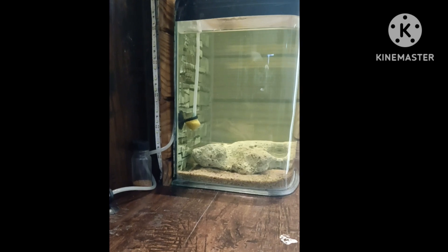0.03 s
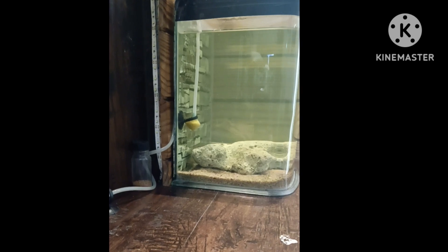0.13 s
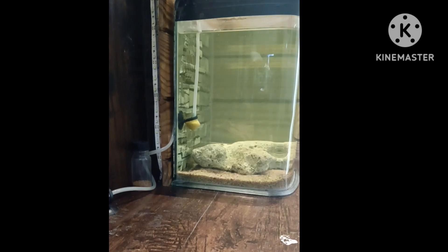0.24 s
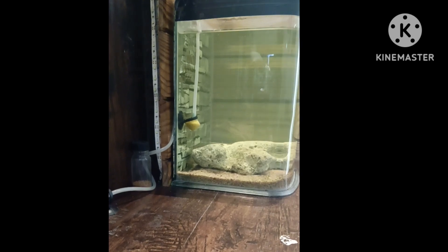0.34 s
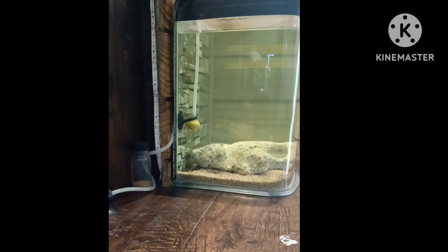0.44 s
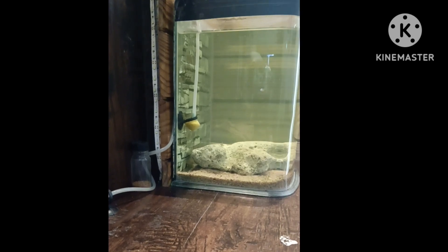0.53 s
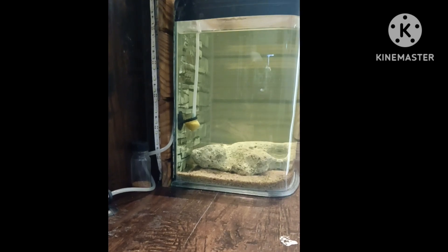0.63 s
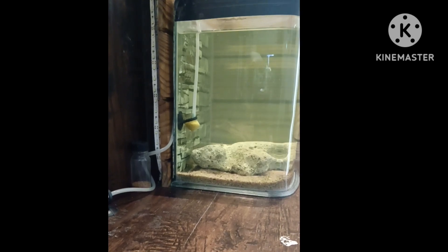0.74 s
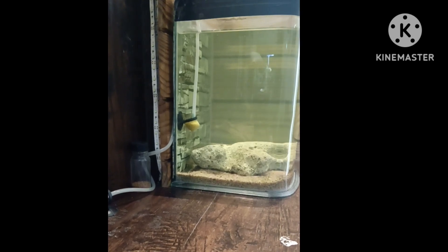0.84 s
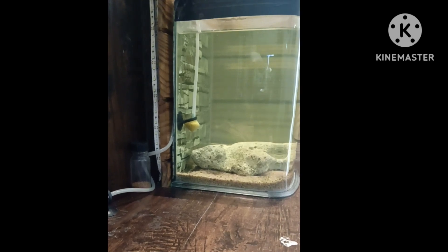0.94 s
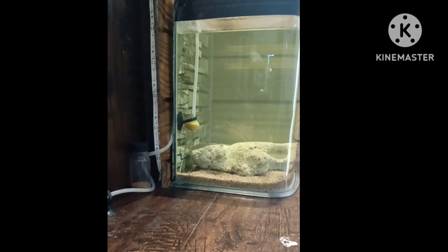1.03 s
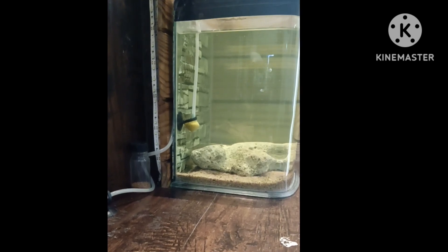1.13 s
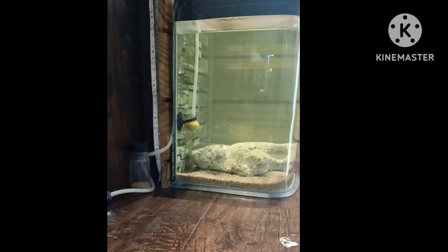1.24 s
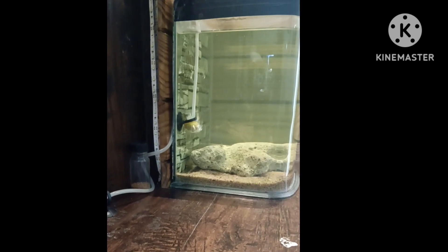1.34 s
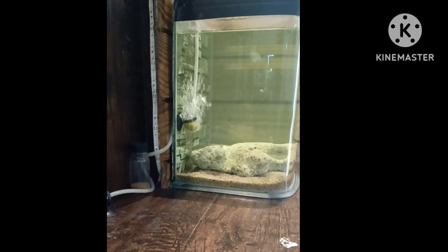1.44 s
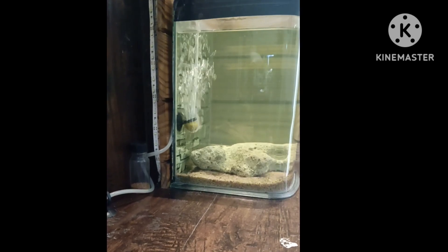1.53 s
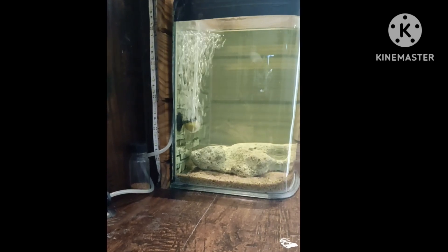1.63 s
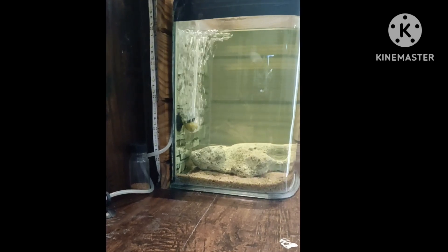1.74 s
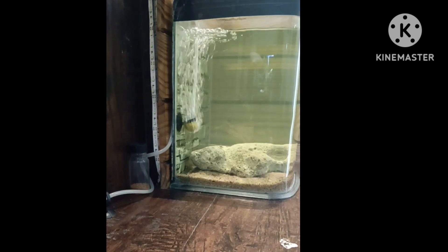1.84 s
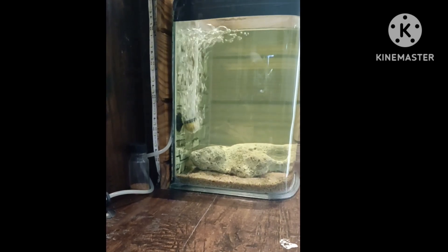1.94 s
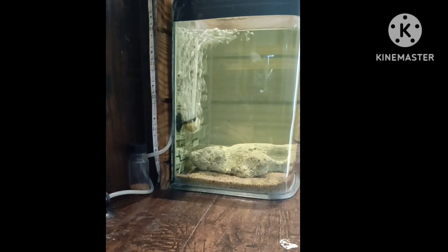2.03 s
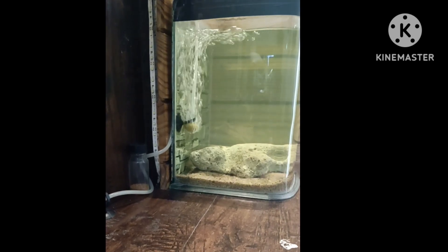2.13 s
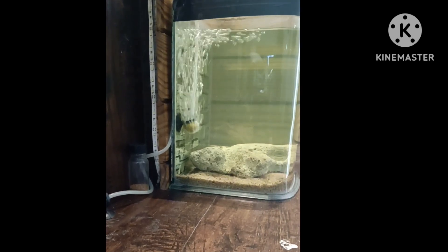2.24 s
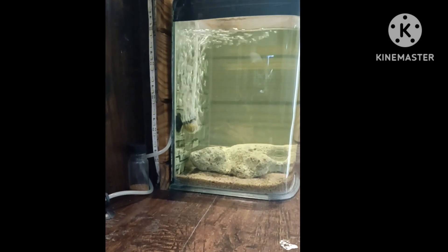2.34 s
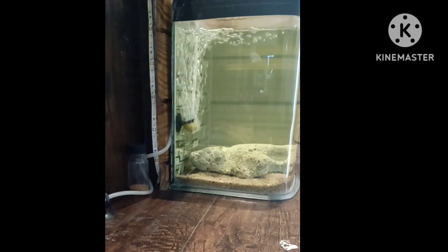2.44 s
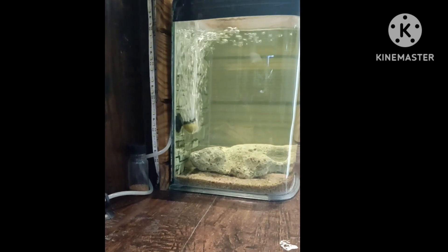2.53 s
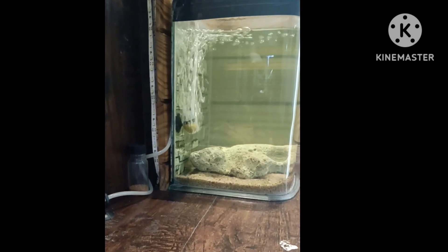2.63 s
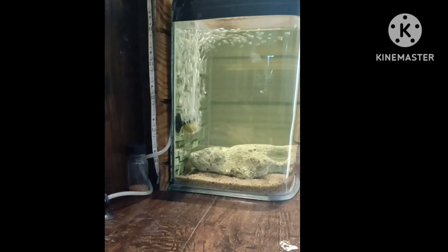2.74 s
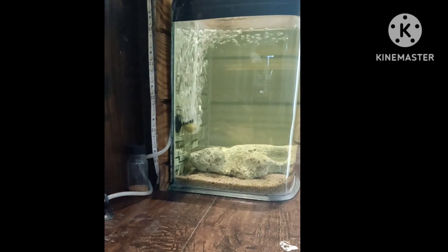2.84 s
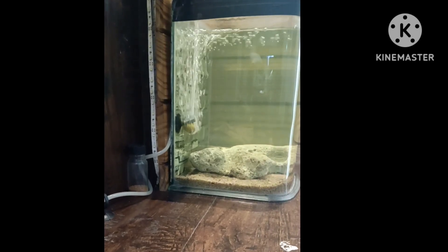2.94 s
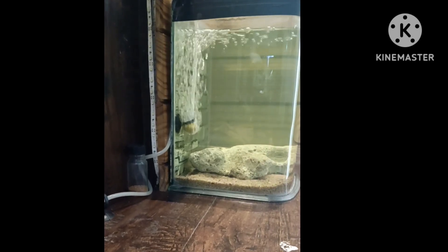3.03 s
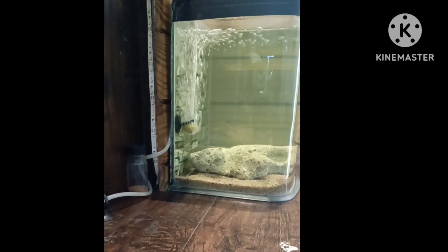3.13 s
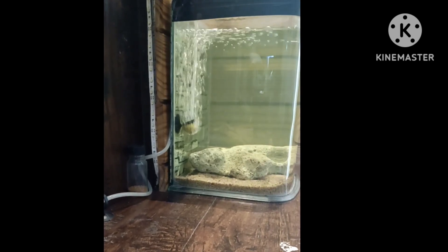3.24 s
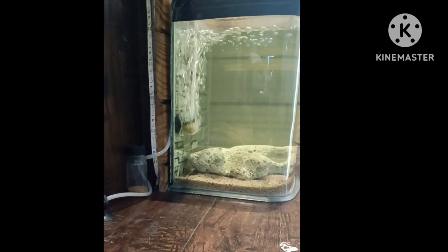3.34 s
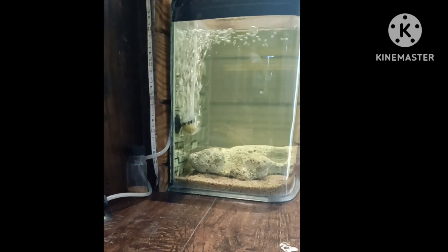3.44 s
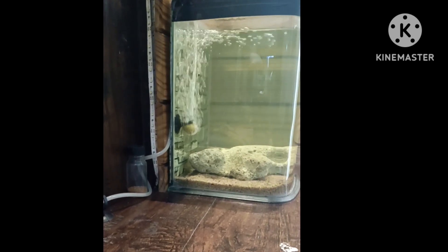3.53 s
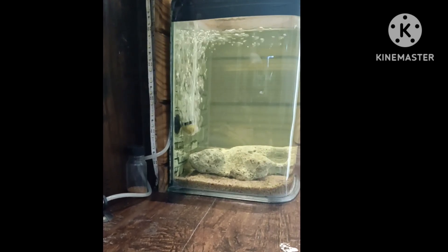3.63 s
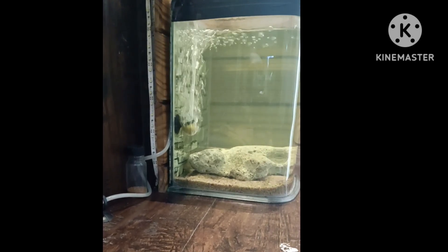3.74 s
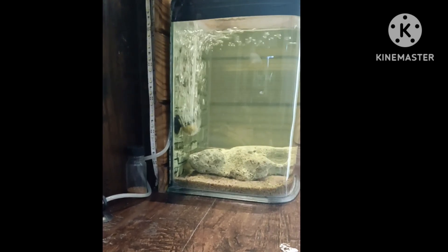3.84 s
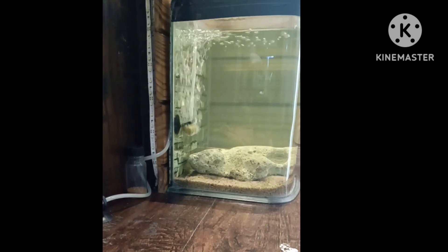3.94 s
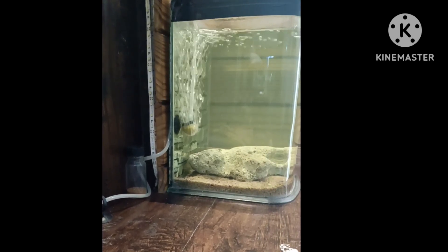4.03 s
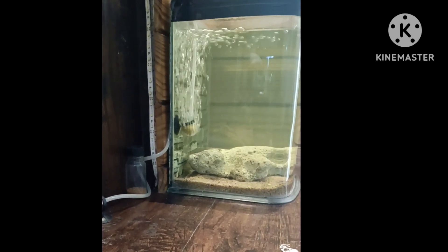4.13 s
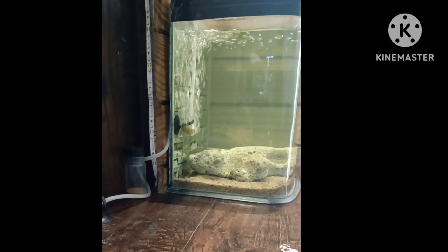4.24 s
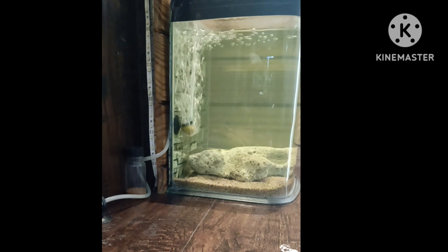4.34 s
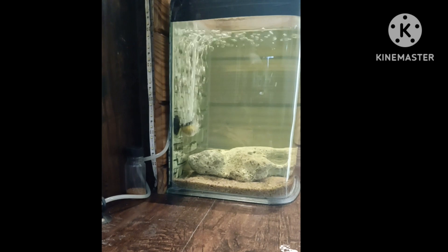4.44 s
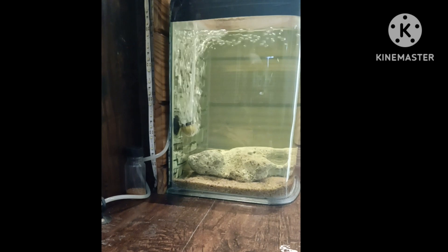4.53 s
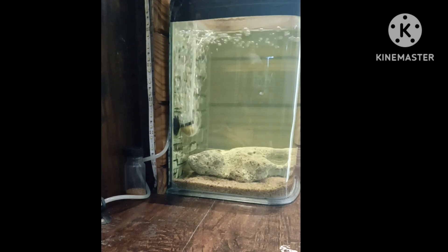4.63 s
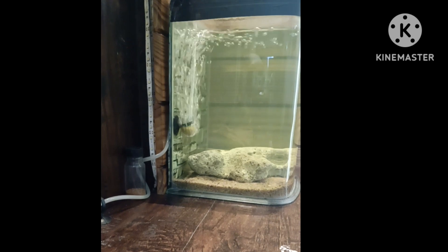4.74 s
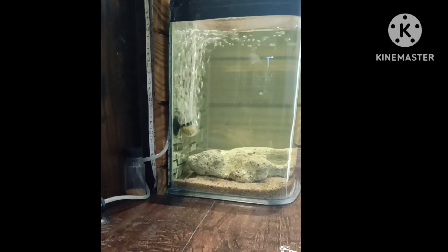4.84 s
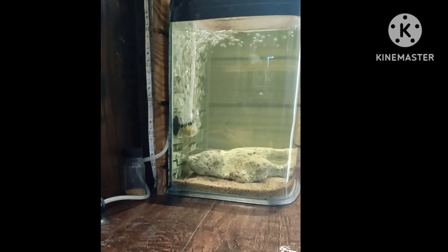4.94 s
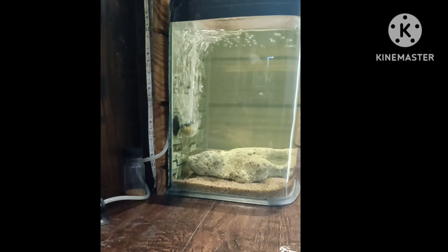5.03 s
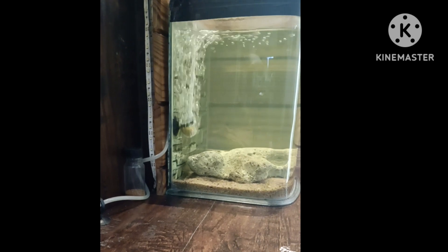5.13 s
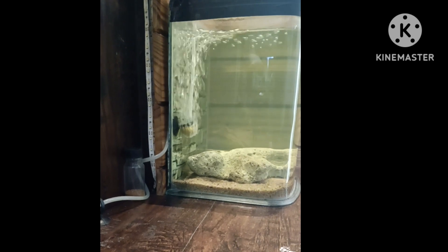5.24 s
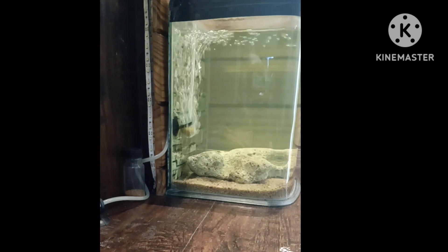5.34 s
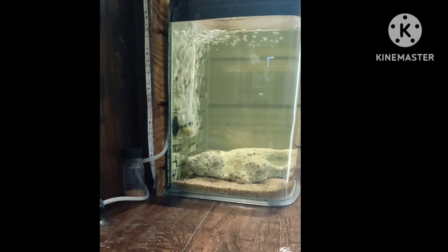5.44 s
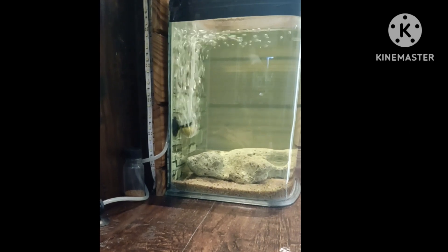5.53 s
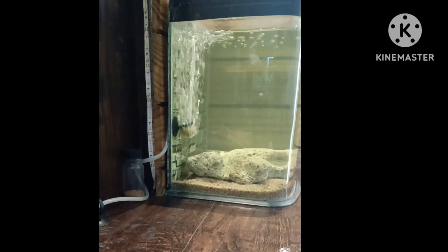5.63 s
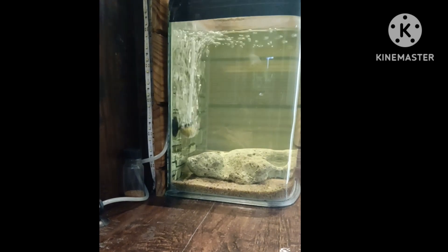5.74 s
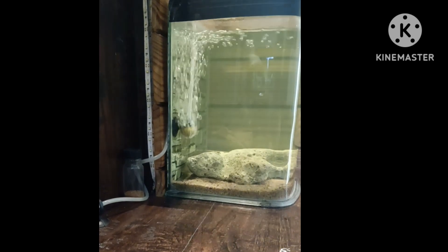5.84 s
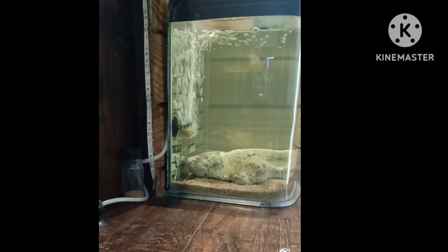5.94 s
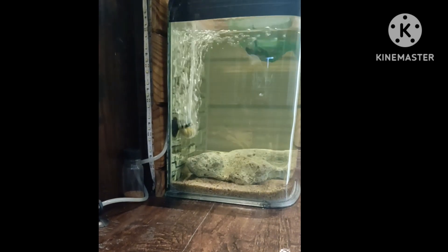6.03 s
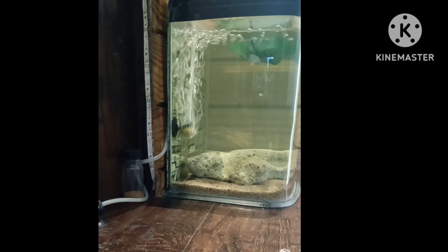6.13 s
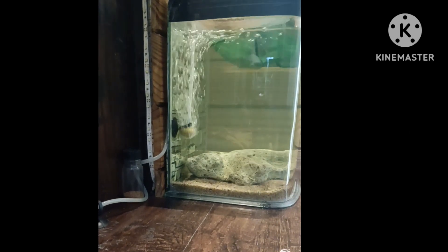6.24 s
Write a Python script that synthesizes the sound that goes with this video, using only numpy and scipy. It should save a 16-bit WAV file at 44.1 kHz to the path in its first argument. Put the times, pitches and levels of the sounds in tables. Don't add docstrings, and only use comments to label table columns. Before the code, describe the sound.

Close handheld stereo pickup indoors: bumps on a wooden table, small drips and distant chirping come first. A loud dry click is followed by a knocking, squeaky motor start. The pump then drones evenly with a nasal buzz, over rushing air and low bubbling, slightly altered as a hand presses and releases it. Faint finger ticks and sparrows continue until the end.

```python
import sys
import numpy as np
from scipy import signal
from scipy.fft import rfft, irfft, next_fast_len
from scipy.io import wavfile
from scipy.ndimage import uniform_filter1d

SR = 44100
rng = np.random.default_rng(int(sys.argv[2]) if len(sys.argv) > 2 else 0)


def natural_amplitude(level_db):
    exponent = np.asarray(level_db, float) / 20
    return 10 ** exponent


def persist_wave(psi):
    counts = np.round(np.clip(psi, -1, 1) * 32767).astype(np.int16)
    wavfile.write(sys.argv[1], SR, np.atleast_2d(counts).T)


N = 277389
T = np.arange(N) / SR
STEP = 64
TREMOR = uniform_filter1d(rng.standard_normal(2 * N), size=40)
STROKE_HZ = 99.9
ON_S = 1.175


def level(x, db):
    return x * natural_amplitude(db) / np.sqrt(np.mean(x ** 2))


def curves(table):
    s, *columns = np.transpose(table)
    return [np.interp(T, s, c) for c in columns]


def on_log(hz, table):
    f, value = np.transpose(table)
    return np.interp(np.log(np.maximum(hz, 1)), np.log(f), value)


def steps(rate):
    k = int(SR / STEP / rate)
    held = np.repeat(rng.standard_normal(N // STEP // k + 2), k)
    slow = uniform_filter1d(uniform_filter1d(held, k), k)
    return 2 * np.tanh(.65 * slow[:len(T[::STEP])])


def fill(slow):
    return np.interp(T, T[::STEP], slow)


def walk(rate):
    return fill(steps(rate))


def sides(pan_db):
    return natural_amplitude(np.array([pan_db, -pan_db]) / 2)


def spell(start, end, rise, fall, height=0.99):
    corners = [start - abs(rise), start, max(end, start), max(end, start) + abs(fall)]
    return np.interp(T, corners, [0, height, height, 0])


def wake(events, fade_s):
    peaks, keep = np.zeros(N), np.exp(-1 / (fade_s * SR))
    for s, db, *_ in events:
        peaks[int(s * SR) + 1] = natural_amplitude(db)
    return (1 - keep ** 2) * signal.filtfilt([1], [1, -keep], peaks, padtype=None)


def add(out, s, db, hz, pan_db, rise, fall, glide, rough):
    t = np.arange(int((rise + 5 * fall) * SR)) / SR
    i = max(int(s * SR), 0)
    pitch = hz * (1 + glide * (t - rise) / fall + rough * TREMOR[i:i + len(t)])
    phase = 2 * np.pi * np.cumsum(pitch) / SR
    shape = np.where(t < rise, np.sin(np.pi / 2 * t / rise) ** 2, np.exp(-(t - rise) / fall))
    out[:, i:i + len(t)] += (natural_amplitude(db) * sides(pan_db)[:, None] * shape * np.sin(phase))[:, :N - i]


# f/Hz, likeness [-1 to 1]
LIKENESS = [(40, 0.4), (110, 0.93), (900, 0.79), (1500, 0.3), (2400, -0.44), (5000, -0.081)]


def hiss(colour, pan, flicker_db):
    size = next_fast_len(N, True)
    hz = np.arange(size // 2 + 1) * SR / size
    alike = np.clip(on_log(hz, LIKENESS), -1, 1)
    mid, side = rfft(rng.standard_normal((2, size)))
    both = np.sqrt(1 + alike) * mid + np.sqrt(1 - alike) * side * np.array([[1], [-1]])
    both = np.complex64(both * natural_amplitude(on_log(hz, colour)) * sides(on_log(hz, pan)))
    octave = np.float32(np.log2(np.maximum(hz, 1) / 40))
    out = 0
    for k in range(-1, 10):
        if on_log(40 * 2. ** (k + np.linspace(-1, 1, 9)), colour).max() <= -38:
            continue
        top = np.searchsorted(octave, k + 1)
        band = irfft(both[:, :top] * np.clip(1 - abs(octave[:top] - k), 0, 1), size)[:, :N]
        out = out + band * np.float32(fill(natural_amplitude(flicker_db * steps(9))))
    return level(out, 0)


# t/s, pressure [0-1]
PRESS = [(1.3, 0.83), (1.4, 0.16), (1.48, 0.63), (1.8, 0.71), (2.14, 0.89), (2.34, 0.65), (2.43, 0),
         (2.55, 0), (2.65, 0.3), (2.8, 0.04), (2.95, 0.06), (3.3, 0.1), (4.3, 0)]


def pressing():
    return curves(PRESS)[0]


# from t/s, to t/s, rise/s, fall/s
LEAN = (5.5, 5.82, 0.087, 0.23)


def leaning():
    return spell(*LEAN)


# f/Hz, level/dB per Hz
ROOM = [(100, -49), (170, -15), (341, -9.5), (400, -13), (599, -7.5), (648, -8.5), (812, -12.5),
        (994, -12.5), (1270, -18), (2500, -19.5), (3250, -51), (5500, -120)]
# f/Hz, level/dB per Hz
AIR = [(1290, -27), (2200, -5.5), (2900, -1), (3170, -4), (3750, -3.5), (4380, -2), (5270, -7.5),
       (5860, -6.5), (9070, -18), (11500, -13), (13200, -24.5), (15200, -20.5)]
# f/Hz, left minus right/dB
ROOM_PAN = [(110, 4.5), (400, -1), (700, 3), (1300, 10.5), (2400, 1.5), (4300, 6.5), (8000, 1.5),
            (15000, 0)]


def room_tone():
    room = natural_amplitude(-64.5) * hiss(ROOM, ROOM_PAN, 3.6)
    street = natural_amplitude(-68) * hiss(AIR + [(15500, -70)], ROOM_PAN, 1.0)
    fridge = natural_amplitude(-70.5 + 0.78 * walk(14)) * np.sin(2 * np.pi * 399.6 * T)
    return room + street + fridge


# t/s, peak level/dB,
# length/s
THUMPS = [(0.0, -56, 0.03), (0.022, -51, 0.015), (0.139, -56.5, 0.02), (0.279, -56, 0.033),
          (0.403, -55, 0.082), (0.469, -51, 0.032), (0.63, -69, .04), (0.747, -61, 0.032),
          (0.928, -65, .03), (1.004, -53, 0.068), (1.04, -75, .04), (1.075, -64, 0.025),
          (1.29, -60.5, 0.048), (1.46, -53.5, 0.013), (1.579, -57, 0.017), (1.75, -60, .03),
          (1.92, -57.5, 0.046), (2.08, -59, .028), (3.44, -69, .03), (2.64, -64, .03), (2.93, -69, 0.017),
          (3.6, -68, .02), (5.571, -70, 0.029)]
# from t/s, to t/s (earlier, so no hold), rise/s, fall/s,
# level/dB
GRIP_DIP = (3, 1.12, 0.76, -2, -17)


def handling():
    near_thumps = wake(THUMPS, 0.09)
    pressed_db = 20.5 * pressing() * (T > ON_S)
    rumble = natural_amplitude(-85 + pressed_db + 3 * leaning()) + natural_amplitude(-18.5) * near_thumps
    shake = natural_amplitude(4 * walk(14))
    bass = [(15, -23.0), (30, -23.5), (90, -6.0), (140, 2.5), (220, -41.0), (500, -73.0)]
    out = shake * rumble * hiss(bass, [(30, -2), (200, 1.7)], 4.6)
    colour = [(100, -33.5), (200, -0.5), (310, -0.5), (450, -12.5), (900, -38.0), (2000, -71.0)]
    out = out + natural_amplitude(-13.5 + spell(*GRIP_DIP)) * shake * near_thumps * hiss(colour, ROOM_PAN, 4.4)
    for s, db, length in THUMPS:
        add(out, s, db + 0.5, 126.8, 1.5, rise=0.013, fall=length, glide=0.004, rough=.1)
    return out


# t/s, peak level/dB, f/Hz, left minus right/dB, length/s
RUSTLES = [(0, -72, 10530, 11, .02), (.195, -65, 10900, 4, 0.022), (0, -63, 4440, 5, 0.0088),
           (0.21, -65, 2800, 14, 0.022), (0.23, -61, 3050, -5, 0.019), (0.269, -62.5, 1700, 31, 0.015),
           (0.308, -66.5, 1750, 12, .02), (.43, -68, 1710, 12, 0.018), (0.733, -63.5, 1490, 12, .012),
           (.28, -66, 2500, 8, .02), (.29, -73, 13000, 1, .04), (0.32, -61.5, 3830, 17, .022),
           (.377, -59, 990, 16, 0.015), (0.658, -62, 2950, 2, 0.036), (0.8, -65.5, 1010, 13, 0.036),
           (.9745, -58.5, 11500, 7, 0.0067), (.985, -68, 11000, 1, 0.013), (1.145, -57.5, 2420, 15, 0.021),
           (1.157, -63.5, 8800, 13, 0.0044), (1.166, -41.5, 1070, 9, 0.0025),
           (1.1715, -42, 1480, 5, 0.0031), (1.183, -43.5, 1100, 0, 0.092), (1.218, -43.5, 490, 9, 0.013),
           (1.333, -50, 1092, 2, 0.021), (1.278, -54, 1999, -5, 0.077), (2.36, -57.5, 1993, 7, .082),
           (5.95, -73, 7520, -8, 0.023)]


def rustles():
    out = np.zeros((2, N))
    for s, db, hz, pan_db, length in RUSTLES:
        rough = min(.006 / length, 2)
        add(out, s, db, hz, pan_db, rise=0.46 * length, fall=length, glide=0, rough=rough)
    return out


# peak t/s, peak level/dB, f/Hz
GULPS = [(1.489, -50.5, 298), (1.527, -61, 260), (1.621, -55, 310), (1.77, -60, 320), (1.826, -56, 311),
         (1.937, -55, 350), (1.966, -57, 334), (2.06, -61, 323), (2.19, -54, 304), (2.25, -48, 336),
         (2.306, -51, 341), (2.39, -59, 318), (2.427, -63, 316), (2.649, -54, 299), (2.739, -55, 297),
         (2.87, -53.5, 309), (2.943, -51.5, 279), (3.038, -55, 291), (3.143, -62, 301), (3.549, -46, 302),
         (3.612, -50.5, 300), (3.731, -59, 291), (3.761, -65, 300), (3.819, -64, 297), (3.914, -70, 288),
         (4.078, -57.5, 305), (4.125, -58, 313), (4.691, -73, 300), (4.785, -59, 308), (4.991, -53, 297),
         (5.119, -67, 300), (5.359, -61, 320), (5.586, -62, 318), (5.627, -50.5, 301), (6.13, -62, 298)]
# peak t/s, peak level/dB, f/Hz
PLINKS = [(1.434, -64, 476), (1.439, -58, 680), (1.524, -54, 677), (1.571, -61, 760), (1.589, -65, 487),
          (1.636, -56, 650), (1.711, -55, 660), (1.734, -57, 660), (1.766, -51, 677), (1.866, -55, 657),
          (1.926, -59, 646), (1.968, -56, 653), (2.065, -55, 643), (2.28, -58, 660), (2.325, -72, 590),
          (2.34, -56, 800), (2.347, -69, 430), (2.357, -61, 613), (2.507, -53, 704), (2.519, -63, 547),
          (2.602, -69, 700), (2.686, -61, 496), (2.751, -63, 740), (2.796, -63, 557), (2.901, -58, 500),
          (2.916, -52, 690), (2.996, -57, 564), (3.031, -54, 583), (3.128, -65, 607), (3.185, -54, 620),
          (3.25, -59, 608), (3.337, -64, 656), (3.38, -56, 665), (3.407, -60, 720), (3.437, -58, 707),
          (3.597, -66, 480), (3.642, -60, 645), (3.644, -66, 477), (3.679, -58, 487), (3.779, -66, 580),
          (3.811, -60, 557), (3.859, -68, 473), (3.956, -66, 546), (4.058, -52.5, 665), (4.213, -65, 560),
          (4.04, -59, 715), (4.253, -52, 668), (4.285, -55, 710), (2.955, -58, 725), (4.417, -55, 625),
          (4.956, -64, 480), (5.014, -59, 634), (5.136, -63, 529), (5.251, -52.5, 690), (5.52, -56, 767),
          (6.026, -53, 690), (6.079, -65, 697), (6.119, -65, 676), (6.263, -65, 507)]
# peak t/s, peak level/dB, f/Hz
DRIPS = [(.17, -60, 298), (.25, -67, 560), (.31, -55.5, 288), (.32, -65, 680), (.393, -58, 714),
         (0.529, -56, 290), (.04, -63, 624), (.08, -67, 539), (.64, -57, 670), (.74, -63, 677),
         (.905, -54, 672), (.955, -60, 332), (1.158, -51, 754), (1.16, -52, 1670), (1.195, -42.5, 618),
         (1.205, -45.5, 1790)]
# f/Hz, left minus right/dB
AIR_PAN = [(200, -7.5), (500, -8), (690, 10), (850, 7.5), (1200, -4.5), (1500, 0), (4000, 11), (5000, -5.5)]


def water():
    running = T > PRESS[0][0]
    colour = [(60, -32), (120, -9.5), (220, 1.0), (320, 2.0), (380, -2.0), (600, -43), (1500, -66)]
    churn = natural_amplitude(-78.5 + 23 * pressing()) + natural_amplitude(-24.5) * wake(GULPS, 0.094)
    out = churn * natural_amplitude(3.0 + 3.8 * walk(30)) * hiss(colour, [(100, -1), (400, 19.5)], 0.95) * running
    glass = hiss([(300, -72), (560, -8.0), (660, 4.5), (760, -19), (1400, -66.5)], AIR_PAN, 0.7)
    singing = natural_amplitude(-13.5) * wake(PLINKS, 0.034)
    out = out + (singing + natural_amplitude(np.where(running, -72, -78))) * natural_amplitude(4.5 * walk(30)) * glass
    for s, db, hz in GULPS:
        add(out, s - 0.01773, db + 4.5, hz, 3.0, rise=0.01773, fall=0.013, glide=0.008, rough=0.3)
    for s, db, hz in PLINKS:
        add(out, s - .011, db + 6.5, hz, 3.0, rise=.011, fall=0.0099, glide=0.012, rough=0.42)
    for s, db, hz in DRIPS:
        add(out, s - .011, db, hz, 5.0, rise=.011, fall=0.015, glide=0.0075, rough=0.14)
    for when, mode, pitch, size in rng.random((380, 4)):
        hz = (300 if mode < .4 else 650) * (.65 + .55 * pitch)
        db = -67 - 3 * np.log(1 - .95 * size)
        add(out, 1.45 + 4.8 * when ** 1.3, db, hz, 1.5, rise=0.0046, fall=.007, glide=0.044, rough=0.29)
    return out


# t/s, peak level/dB, f/Hz, left minus right/dB
TICKS = [(0.1082, -55, 5770, 7), (.185, -58, 5670, 17), (0.1965, -56.5, 7300, 7), (.208, -61, 5780, 16),
         (0.2994, -61, 5690, 10), (0.3594, -62, 5760, 13), (1.612, -63, 5930, 13), (2.5137, -61, 10550, 8),
         (3.355, -67, 10280, -11), (3.627, -64, 10530, -13), (4.4146, -68.5, 9350, -19),
         (4.4644, -58.5, 10470, 14.5), (4.478, -68, 7830, -12), (5.22, -72, 13050, -2),
         (5.892, -64, 10200, -14), (5.912, -58, 10390, -10), (5.9392, -66, 9900, -5)]


def finger_ticks():
    out = np.zeros((2, N))
    for s, db, hz, pan_db in TICKS:
        add(out, s, db - 7.5, hz, pan_db, rise=0.0037, fall=0.023, glide=-0.0042, rough=0.16)
    return out


# t/s, peak level/dB, f/Hz
CHIRPS = [(0.14, -55, 4220), (0.2214, -61, 4190), (0.3075, -55, 4400), (.405, -63, 4420), (.497, -62, 4210),
          (0.5496, -64, 4080), (.65, -66, 3680), (0.8815, -56.5, 4360), (1.433, -58, 4380),
          (1.51, -61, 4170), (2.187, -59, 4060), (2.365, -60.5, 4030), (3.099, -63, 3790),
          (3.268, -55.5, 4140), (3.6361, -62, 4900), (3.66, -61, 4080), (3.7517, -61, 4110),
          (3.838, -62, 4040), (4.0228, -67, 4170), (4.2837, -59.5, 4080), (4.484, -60, 4760),
          (5.0794, -65, 4300), (5.143, -58.5, 4100), (5.2894, -64, 4730), (5.412, -60, 4230),
          (5.5308, -56.5, 4770), (5.8052, -57.5, 4220), (5.821, -56.5, 4800), (5.876, -58, 4770),
          (6.02, -63, 4390), (6.191, -57.5, 4480)]


def birds():
    out = np.zeros((2, N))
    for s, db, hz in CHIRPS:
        add(out, s - .01, db - 9.5, hz, 18.5, rise=0.0147, fall=.02, glide=-0.012, rough=0.15)
    for when, pitch, size, slide in rng.random((140, 4)):
        db, hz = -77 + 8.5 * size, 3700 + 1200 * pitch
        add(out, when * N / SR, db, hz, 7.0, rise=.01, fall=.014, glide=.06 * (slide - .5), rough=.2)
    across = np.roll(out[::-1], int(.011 * SR), axis=1)
    return out + 0.5 * across + .5 * np.roll(out, int(0.025 * SR), axis=1)


# t/s, peak level/dB, left minus right/dB
CLICKS = [
    (0.978, -31, 17.5),
]
# f/Hz, level/dB, t60/s
ROCKER = [(1697, 0, .036), (1742, -2, .03), (1400, -19, .08), (1950, -14, .02), (2480, -20, .04)]


def switch():
    out, t = np.zeros((2, N)), T[:SR // 10]
    ring = sum(natural_amplitude(db) * np.sin(2 * np.pi * hz * t) * 1000 ** (-t / t60) for hz, db, t60 in ROCKER)
    ring = ring * (1 - np.exp(-t / 0.0027))
    ring = ring + 0.11 * np.roll(ring, int(0.012 * SR)) + .06 * np.roll(ring, int(0.023 * SR))
    for s, db, pan_db in CLICKS:
        i = int(s * SR)
        out[:, i:i + len(t)] += natural_amplitude(db - 4.0) * sides(pan_db)[:, None] * ring
    return out


# f/Hz, level/dB per Hz
RUSH = [(60, -51), (200, -12.5), (440, -15), (620, -10), (1000, 4), (1350, -1), (1520, -4), (1820, -2.5),
        (1960, -6), (2120, -44), (3000, -40), (4000, -83)]
# from t/s, to t/s, rise/s, fall/s, gain/dB
GASPS = [
    (1.164, 1.223, .008, 0.026, 5.5),
    (1.3, 1.337, 0.091, 0.065, 4.5),
]
# from t/s, to t/s (earlier, so no hold), rise/s,
# fall/s, level/dB
STIR = (2.1, 1.17, 0.6, 1, -63.5)
# from t/s, to t/s, rise/s, fall/s, gain/dB
SQUEAL = (1.4, 1.28, 0.029, .1, 13.7)
# from t/s, to t/s, rise/s, fall/s
LIFT = (2.41, 2.424, 0.034, 0.047)
# peak t/s, peak level/dB, f/Hz
FLAPS = [(1.27, -66.5, 5150), (1.302, -64.5, 5220), (1.364, -68, 5150), (1.407, -67, 5150),
         (1.584, -75, 5070), (1.661, -69, 4610), (1.717, -68, 4590), (1.813, -67, 4540), (1.892, -67, 4800),
         (1.941, -70, 5030), (1.998, -73.5, 5320), (2.217, -71, 5240), (2.247, -68, 4800),
         (3.07, -75, 5300), (4.434, -71, 5350), (5.06, -75, 5300), (5.867, -75, 5300), (5.923, -72, 5300)]


def air_rush(turn, off_db):
    rush_db = -53 + off_db + sum(spell(*gasp) for gasp in GASPS) - 2.7 * spell(*LIFT) - 0.85 * leaning()
    air = (natural_amplitude(rush_db) + natural_amplitude(STIR[4]) * spell(*STIR[:4])) * hiss(RUSH, AIR_PAN, 2.7)
    colour = [(3000, -69), (4000, -6), (4600, -3.5), (5200, -1), (5600, -9.5), (7000, -70)]
    buzz_db = -78 + off_db + 9 * pressing() - 1.5 * leaning() + spell(*SQUEAL) + 3.9 * walk(40)
    air += natural_amplitude(buzz_db) * hiss(colour, AIR_PAN, 6.1)
    for s, db, hz in FLAPS:
        add(air, s - 0.017, db + 0.5, hz, -17, rise=0.017, fall=0.027, glide=.004, rough=0.19)
    puff = 1 + 0.31 * np.cos(turn) + 0.29 * np.cos(2 * turn)
    return puff * air


# from t/s, to t/s, rise/s, fall/s
KNOCKING = (1.226, 1.326, 0.023, 0.0099)
# f/Hz, width/Hz, level/dB
HOUSING = [
    (252, 380, -17),
    (845, 140, -1.5),
    (1240, 310, 2),
    (1894, 140, -11.5),
]


def knocks(turn):
    out, knocking = np.zeros(N), spell(*KNOCKING)
    now = knocking > 0
    for k in range(2, 21):
        f = k * STROKE_HZ
        answer = sum(natural_amplitude(db) * (1j * f * w / (c * c - f * f + 1j * f * w)) ** 3 for c, w, db in HOUSING)
        out[now] += np.real(answer * np.exp(1j * k * (turn[now] + 0.085)))
    knock_db = -39.5 - 16 * (T - KNOCKING[0]) - 14 * (1 - knocking)
    return natural_amplitude(knock_db) * (out / np.std(out[now])) * sides(1.0)[:, None]


# multiple of stroke rate, level/dB, left minus right/dB, left lead/rad
OVERTONES = [(1, -85.4, 5.0, -0.3), (2, -64.9, -7.0, 0.5), (3, -65, 4.0, -0.8), (4, -79, 5.0, -0.3),
             (5, -68.5, 2.0, 1.4), (6, -62.6, -3.0, 0.1), (7, -64, -9.0, 0.1), (8, -54.7, 12.0, -0.1),
             (9, -64.3, 3.0, -0.6), (10, -54.0, 6.0, 0.2), (11, -49.7, 2.0, 0.1), (12, -59.5, -1.0, 0.4),
             (13, -47.0, -1.0, -0.1), (14, -49.7, -5.0, -0.3), (15, -80.1, -2.0, -2.7),
             (16, -63.5, -15.0, 3.0), (17, -60.4, 1.0, 1.4), (18, -57.9, 2.0, 1.4), (19, -62.0, -3.0, 0.6),
             (20, -92.6, -10.0, -1.7), (21, -81.7, -3.0, 0.4), (45, -88, -9.0, 2.4), (46, -90, -6.0, 2.4),
             (47, -90, -3.0, 2.4), (48, -85, 3.0, -3.1), (50, -85, -2.0, 2.3), (51, -83.5, -12.0, 2.1),
             (52, -91.5, -15.0, 1.1), (53, -83.5, -13.0, -2.1), (54, -91.8, -7.0, -2.0)]
# multiple of stroke rate, then pressed, hopping, shaded, slack, settling (each level/dB)
ANSWER = [(2, 12.5, -3, 0, -4, -1), (2.98, 13, 7, 0.5, -4.5, 0), (3.9, 2.5, -4, 0, -12, -4),
          (5, 1.5, -2, -1, -7, 0.5), (6.04, -4.5, -4, -2.5, -3, -4.5), (7.86, 0, -21, 1.5, -1, -0.24),
          (9, 0, -14, 0.5, -10, 1), (10, 1, -8, 0, -3, -0.7), (11.35, 1, 5.5, 0, 1.5, -0.8),
          (12, 2.5, -3, -6, -2, 2), (13.1, 0.5, 1, -2, -3, 0.4), (16, -1.5, -13, 2, 0.5, -3.5),
          (17.4, -5.5, -10, 2.5, -1, -4), (18.1, -0.5, -13, -1, -2, -0.3), (18.7, 0.5, 1, -1, 2, 0),
          (46.6, 16, -9, 2, -1, -1.5), (50, 7.5, -7, 1, -4, -2)]
# from t/s, to t/s, rise/s, fall/s
SLACK = (1, 1.47, .01, 0.2)


def armature_hum(turn, off_db):
    rebound_size, rebound_lag = 0.655, .277
    rattle_size, rattle_lag = .41, .81
    settling = (T - 3.8) / 2.5
    causes = pressing(), spell(*LIFT), leaning(), spell(*SLACK), settling
    multiple, *answers = np.transpose(ANSWER)
    hum = np.zeros((2, N), np.float32)
    for k, db, pan_db, lead in OVERTONES:
        swell = sum(np.interp(k, multiple, db_at) * cause[::STEP] for db_at, cause in zip(answers, causes))
        slow_db = np.interp(k, [2, 3, 8, 11, 30, 45], [1.2, 2.0, .8, .4, 1.0, 5.0])
        quick_db = np.interp(k, [2, 3, 7, 10, 11, 30, 45], [1.8, 3.2, 3.2, 1.4, .3, .3, 4])
        swell = swell + slow_db * steps(12) + quick_db * steps(32)
        rebound = rebound_size * np.exp(2j * np.pi * k * rebound_lag)
        rattle = rattle_size * np.exp(2j * np.pi * k * rattle_lag)
        start = np.angle(1 - rebound - rattle)
        start += 2 * np.pi * k * (.139 * np.log2(k) - .028)
        share = 2 * sides(pan_db) / np.hypot(*sides(pan_db))
        phase = np.float32(k) * turn + np.float32([[start + lead / 2], [start - lead / 2]])
        hum += np.float32(fill(natural_amplitude(db + swell))) * np.float32(share)[:, None] * np.cos(phase)
    hum_db = 0.5 + off_db - 29 * spell(*KNOCKING)
    return natural_amplitude(hum_db) * hum


# t/s, stroke rate off by f/Hz
HUNT = [
    (1.17, .3),
    (1.205, .8),
    (1.25, .55),
    (1.3, .1),
    (1.322, -1.5),
    (1.352, -1.3),
    (1.375, .1),
    (1.42, 0),
]


def pump():
    hz = STROKE_HZ + 0.006 * walk(1.95) + curves([(0, 0.00014), (1.1, 0.0011)] + HUNT)[0]
    first_stroke = .27
    turn = (2 * np.pi * ((np.cumsum(hz) / SR - first_stroke) % 1)).astype(np.float32)
    off_db = -42.5 * (1 - spell(ON_S, N / SR, 0.012, 1))
    return armature_hum(turn, off_db) + knocks(turn) + air_rush(turn, off_db)


def scene():
    before = room_tone() + handling() + rustles() + water() + finger_ticks() + birds()
    return before + switch() + pump()


def roll_off(x):
    return signal.sosfilt(signal.butter(12, 15330, fs=SR, output="sos"), x)


def record(dry):
    mix = signal.sosfilt(signal.ellip(10, .3, 80, 15230, fs=SR, output="sos"), dry)
    return roll_off(mix)


dry = scene()
out = record(dry)
persist_wave(out)
```